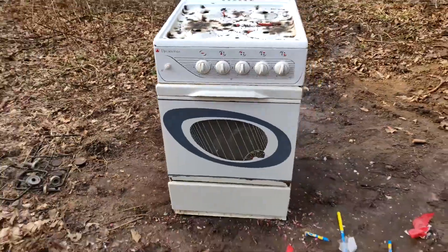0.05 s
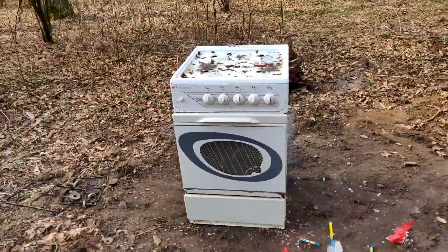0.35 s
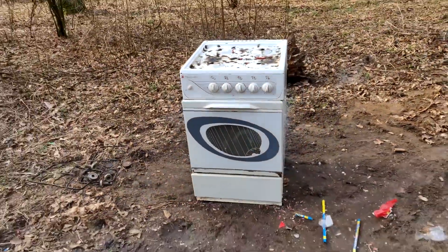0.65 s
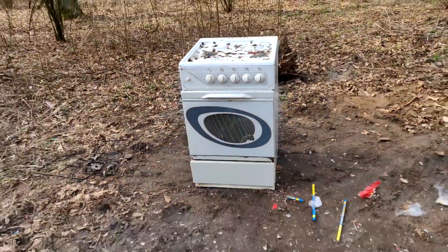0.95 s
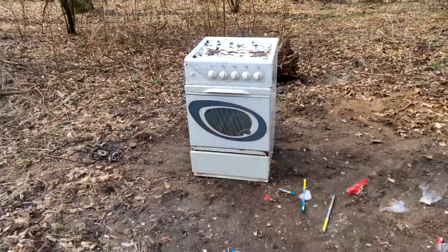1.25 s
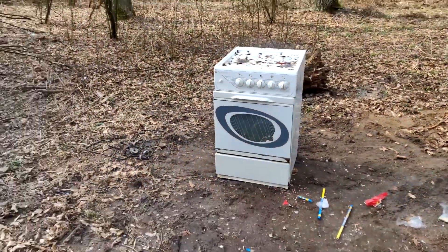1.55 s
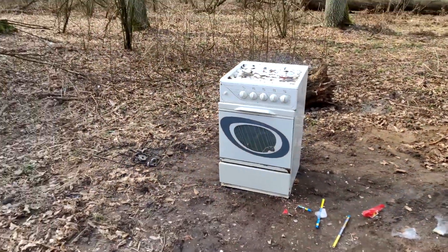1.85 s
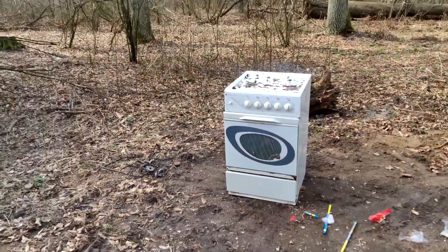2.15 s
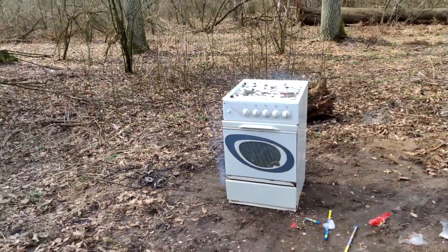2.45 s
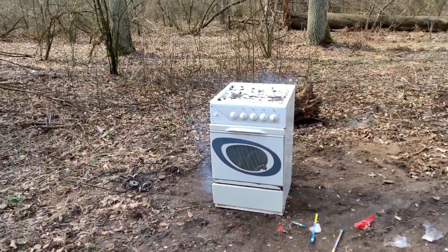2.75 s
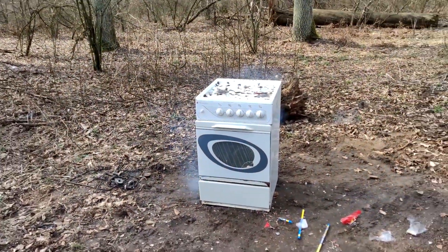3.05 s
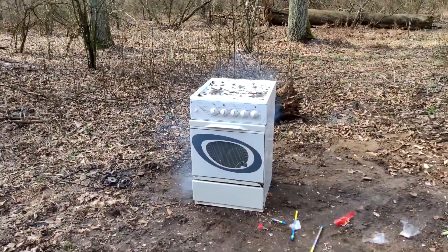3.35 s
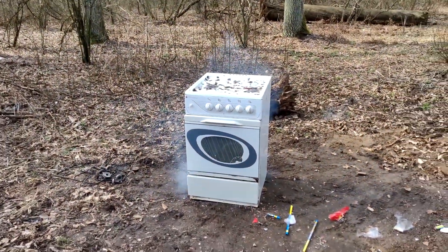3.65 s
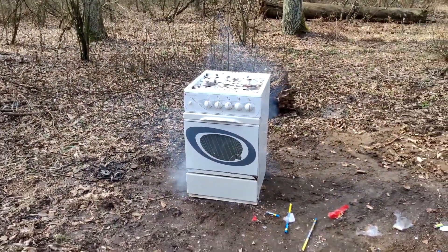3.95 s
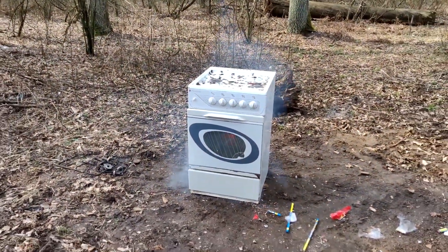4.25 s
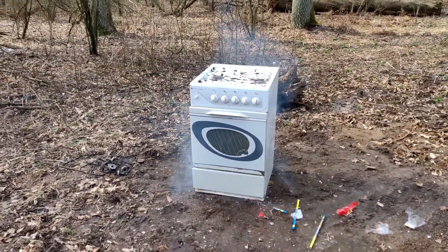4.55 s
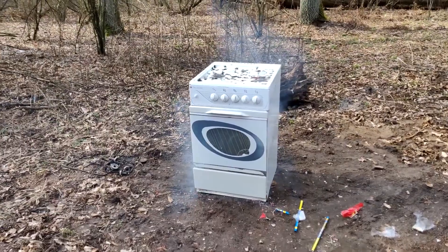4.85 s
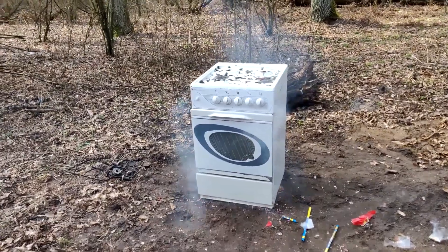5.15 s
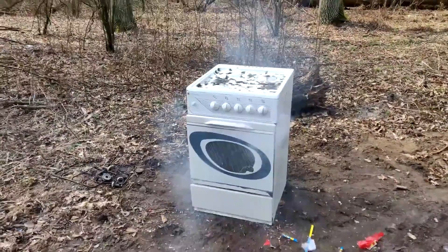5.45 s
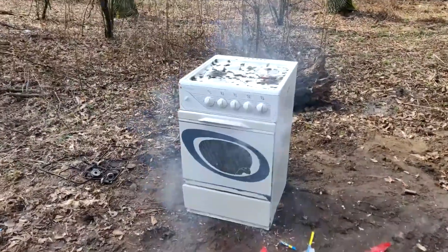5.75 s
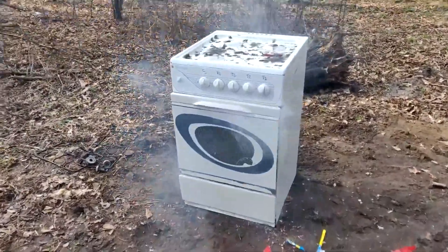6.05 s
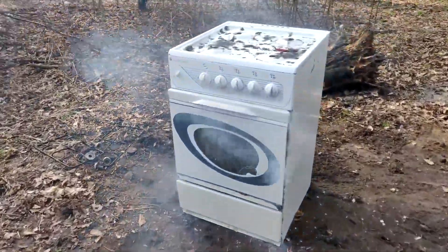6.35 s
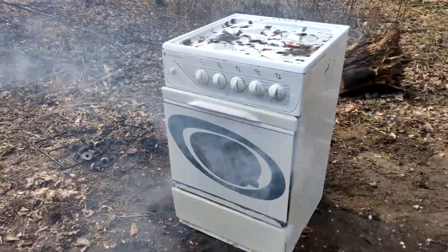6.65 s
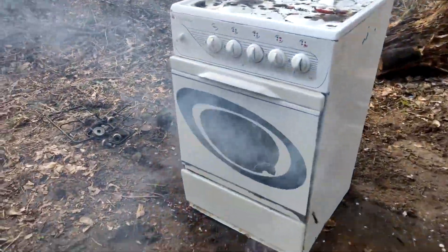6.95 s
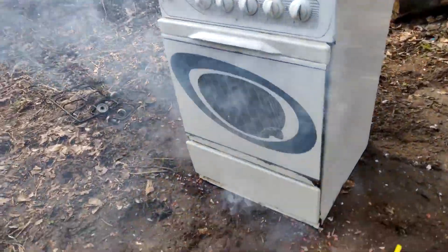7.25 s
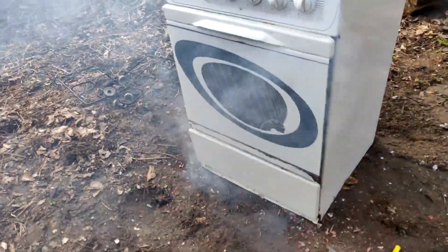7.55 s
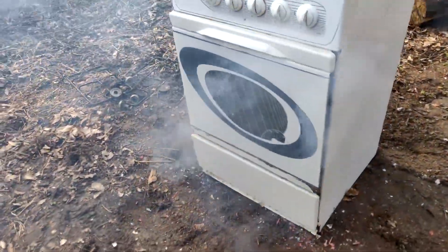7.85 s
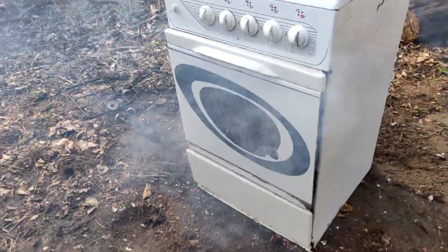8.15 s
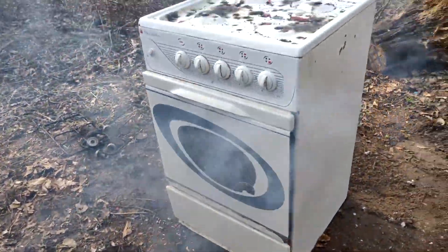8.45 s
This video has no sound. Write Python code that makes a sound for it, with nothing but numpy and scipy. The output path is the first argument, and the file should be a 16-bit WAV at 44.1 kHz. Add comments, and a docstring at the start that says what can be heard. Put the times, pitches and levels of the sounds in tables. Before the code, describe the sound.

Whistling firecrackers fire one after another in a metal oven outdoors, following a few quiet footsteps over faint wind. Brief piercing, hissing squeals start with pops and low puffs, alternating irregularly with sharp bangs that make the steel box ring. Each blast echoes among the trees and pushes air at the close, distorting microphone. Small scraps click lightly in between, and a last squeal runs into a final bang.

```python
"""Whistling firecrackers in an oven

A few soft steps, then firecrackers go off in a steel kitchen oven standing in a wood. Each lights
with a pop and shrieks as pulsing combustion sounds its tube, on a gliding pitch that hops up as the
fuel runs out. Bangs ring the sheet metal, echo among the trees and shove air at the close,
overloaded microphone."""
import sys
import numpy as np
from scipy import signal
from scipy.fft import rfft, irfft, next_fast_len
from scipy.io import wavfile

SR = 44100
rng = np.random.default_rng(int(sys.argv[2]) if len(sys.argv) > 2 else 0)


def int16_out(signal):
    """Quantize to a 16-bit WAV file."""
    q = np.round(np.clip(np.atleast_2d(signal).T, -1, 1) * 32767)
    wavfile.write(sys.argv[1], SR, q.astype(np.int16))


N = 383669
TIME = np.arange(N) / SR
LEFT_RIGHT = np.array([[1], [-1]])


def from_db(db):
    """Decibels to amplitude."""
    return 10 ** (np.asarray(db) / 20)


def rms_one(x):
    """Scale to rms 1."""
    return x / np.sqrt(np.mean(x ** 2) + 1e-20)


def at_hz(points, hz, column=1):
    """Interpolate a table on a log-frequency axis."""
    points = np.array(points)
    return np.interp(np.log(np.maximum(hz, 1)), np.log(points[:, 0]), points[:, column])


def add(out, start_s, sound):
    """Mix a sound in from start_s."""
    start = min(max(round(start_s * SR), 0), N)
    part = sound[..., :N - start]
    out[..., start:start + part.shape[-1]] += part


def decay(t60_s, size=SR):
    """Exponential fall, 60 dB in t60_s."""
    return np.exp(-np.log(1000) * TIME[:size] / max(t60_s, 1e-3))


def onset(rise_s, size=SR):
    """Exponential rise to 1."""
    return 1 - np.exp(-TIME[:size] / rise_s)


def drift(up_to_hz):
    """Smooth random motion, rms 1."""
    n = next_fast_len(N)
    hz = np.fft.rfftfreq(n, 1 / SR)
    lowpassed = rfft(rng.standard_normal(n)) / (1 + (hz / up_to_hz) ** 2)
    return rms_one(irfft(lowpassed)[:N])


# Left-right likeness: freq_hz, correlation
STEREO_CORRELATION = [(30, 0.97), (150, 0.86), (1000, 0.81), (3000, 0.5), (8000, 0.34), (16000, 0)]

def noise(spectrum, size=N):
    """Coloured stereo noise, channels more alike in the bass, rms 1."""
    n = next_fast_len(size, True)
    hz = np.fft.rfftfreq(n, 1 / SR)
    mid, side = rfft(rng.standard_normal((2, n))) * from_db(at_hz(spectrum, hz)) * (hz > 20)
    alike = np.clip(at_hz(STEREO_CORRELATION, hz), -1, 1)
    stereo = np.sqrt(1 + alike) * mid + np.sqrt(1 - alike) * side * LEFT_RIGHT
    return rms_one(irfft(stereo, n)[:, :size])


def tap(hz, t60_s, skirt_db):
    """Noise burst around one broad resonance."""
    peak = [(hz / 8, skirt_db), (hz / 2, skirt_db / 2), (hz, 0),
            (hz * 2, skirt_db / 2), (hz * 16, skirt_db * 2)]
    return noise(peak, size=SR) * decay(t60_s)


# Wind noise: freq_hz, density_db
WIND_SPECTRUM = [(15, -53), (25, -4), (53, 3.5), (141, -7.5), (439, -16.5), (641, -20.5), (1020, -22.5),
                 (1130, -28), (1290, -22), (1400, -31), (2220, -28), (3340, -34), (16000, -40)]

def wind(level_db=-47.5):
    """Faint, low rush of moving air."""
    return from_db(level_db + 0.29 * drift(14)) * noise(WIND_SPECTRUM)


# Scatter from the trees: freq_hz, level_db, t60_s
TREE_SCATTER = [(60, -8, 4.9), (153, -7, 2.4), (398, -3, 2.27), (900, -2.5, 2.67), (1850, -1, 2.23),
                (3100, 4, 1.45), (4272, 3, 1.33), (6050, 7, 1.01), (10000, 6, 0.58), (16000, -27, 0.33)]

def tree_echo(sound, build_s=0.031):
    """Echoes from countless trunks build up, then die away, treble first."""
    size, response = 2 * SR, 0
    edges_hz = np.geomspace(50, 17000, 15)
    for low, high in zip(edges_hz, edges_hz[1:]):
        hz = np.sqrt(low * high)
        bandpass = signal.butter(2, [low, high], "band", fs=SR, output="sos")
        band = signal.sosfilt(bandpass, rng.standard_normal((2, size)))
        level_db, t60_s = at_hz(TREE_SCATTER, hz), at_hz(TREE_SCATTER, hz, column=2)
        response += band * from_db(level_db) * decay(t60_s, size)
    response = rms_one(response * onset(build_s, size)) / np.sqrt(size)
    return signal.fftconvolve(sound, response, axes=1)[:, :N]


# Fuse noise: freq_hz, density_db
FIZZ_SPECTRUM = [(200, -40), (900, -13), (2500, 0.5), (5000, -11.5), (7500, -5.5), (11000, -21.5),
                 (14000, -11), (16000, -13)]
# Burning fuses: start_s, length_s, level_db
FUSES = [(2.8, .7, -62), (4.7, .75, -61), (6.2, .74, -47)]

def fuses(hiss_floor_db=-72, edge_s=0.08):
    """Lit fuses fizz unevenly over a faint, steady, high background hiss."""
    level = from_db(hiss_floor_db)
    for start_s, length_s, level_db in FUSES:
        inside_s = np.minimum(TIME - start_s, start_s + length_s - TIME)
        level = level + from_db(level_db) * np.clip(inside_s / edge_s, 0, 1)
    return level * from_db(1.5 * drift(2.2)) * noise(FIZZ_SPECTRUM)


# Footfalls: start_s, level_db, centre_hz, t60_s
STEPS = [(0.126, -34, 238, 0.06), (1.186, -37, 398, 0.034), (1.253, -29.5, 400, 0.04),
         (1.41, -48.5, 816, 0.17), (1.797, -33, 153, 0.15), (2.061, -36, 615, 0.075),
         (2.091, -36.5, 505, 0.085)]

def steps():
    """Feet land dully on soil and leaves."""
    out = np.zeros((2, N))
    for start_s, level_db, centre_hz, t60_s in STEPS:
        add(out, start_s, from_db(level_db) * tap(centre_hz, t60_s, skirt_db=-43) * onset(0.00093))
    return out


# Scrap impacts: start_s, level_db, centre_hz
SCRAP_CLICKS = [(.75, -58, 8000), (1.38, -53, 7500), (3.365, -34.5, 1720), (3.408, -37.5, 3260),
                (5.398, -34.5, 1750), (6.447, -42, 910), (6.852, -27.5, 1350)]

def scraps():
    """Falling scraps click lightly."""
    out = np.zeros((2, N))
    for start_s, level_db, centre_hz in SCRAP_CLICKS:
        add(out, start_s, from_db(level_db) * tap(centre_hz, t60_s=0.091, skirt_db=-15.5))
    return out


# Venting gas: start_s, level_db, centre_hz, t60_s
VENT_THUDS = [(2.406, -19, 140, 0.24), (3.494, -23, 140, .15), (4.309, -25.5, 141.7, .3),
              (4.89, -13, 134.5, 0.13), (6.06, -11.5, 200, 0.1), (6.095, -14.5, 149, 0.23),
              (6.945, -15, 231, 0.22), (8.227, -14, 217.6, 0.17), (8.24, -11.5, 125, 0.26)]

def vent_thuds():
    """Gas leaves the oven cavity in low, hollow puffs."""
    out = np.zeros((2, N))
    for start_s, level_db, centre_hz, t60_s in VENT_THUDS:
        add(out, start_s, from_db(level_db) * tap(centre_hz, t60_s, skirt_db=-23) * onset(0.0043))
    return out


# Cavity and panel modes: freq_hz, level_db, t60_s
OVEN_MODES = [(123, -27, .4), (151, -39, .9), (242, -38, .8), (440, -23, .25), (525, -20, .25),
              (619, -33, .8), (834, -31, .85), (996, -27, .2), (1184, -29, .85), (1232, -28, .3),
              (1943, -30, .25), (2220, -29, .2), (2450, -29, .2)]

def oven_ring(panel_hz, favour_db=9):
    """A blow rings the oven's modes, favouring those near the pitch of the panel hit hardest."""
    out = 0
    for hz, level_db, t60_s in OVEN_MODES:
        nearness = np.exp(-(np.log(hz / panel_hz) / 0.2) ** 2)
        phase = rng.uniform(0, 2 * np.pi) + rng.normal(0, 1.0, (2, 1))
        gain = from_db(level_db + favour_db * nearness + rng.normal(0, 0.45))
        out += gain * decay(t60_s) * np.sin(2 * np.pi * hz * TIME[:SR] + phase)
    return out


# Ignition puff: freq_hz, density_db
PUFF_SPECTRUM = [(30, -5), (70, 11.5), (160, 17), (300, -9), (520, 4), (750, 4.5), (1200, 8), (2300, 4.5),
                 (3500, 1), (6500, -13), (16000, -32)]
# Ignitions and casing knocks: start_s, level_db, t60_s, panel_hz
POPS = [(2.225, -21, 0.42, 516), (2.259, -8.5, 0.077, 480), (2.406, -16, 0.45, 132),
        (2.509, -19, 0.25, 130), (4.272, -26, 0.17, 599.6), (4.315, -15, 0.46, 129),
        (4.582, -13.5, 0.067, 716), (4.872, -17.5, 0.06, 622), (4.899, -14, 0.13, 830),
        (5.031, -14.5, 0.063, 304), (5.159, -21, 0.19, 311.3), (5.827, -9.5, 0.14, 480),
        (5.961, -16, 0.3, 700), (7.514, -13, 0.13, 131.9), (7.547, -12.5, 0.16, 134),
        (8.2239, -2.5, 0.16, 135), (8.529, -13.5, 0.097, 846)]

def pops(ring_db=1.5):
    """Ignition puffs and knocking casings sound the steel box."""
    out = np.zeros((2, N))
    for start_s, level_db, t60_s, panel_hz in POPS:
        puff = noise(PUFF_SPECTRUM, size=SR) * decay(t60_s)
        ring = from_db(ring_db) * oven_ring(panel_hz)
        add(out, start_s, from_db(level_db) * (puff + ring) * onset(0.0015))
    return out


# Air shoved at the microphone: start_s, left_gain, right_gain, first_swing_hz
PRESSURE_WAVES = [(3.51, 0.35, 0.096, 1.77), (3.663, -0.45, 2.03, 12.9), (5.474, 0.51, 1.54, 11.3),
                  (6.003, 0.072, 1, 17.06), (6.937, 0.44, 1.48, 10.4)]

def pressure_waves(slowing_s=0.0619, t60_s=1.62):
    """A pressure wave swings each diaphragm to and fro, ever more slowly."""
    out, t = np.zeros((2, N)), TIME[:2 * SR]
    for start_s, left_gain, right_gain, first_swing_hz in PRESSURE_WAVES:
        cycles = first_swing_hz * slowing_s * np.log1p(t / slowing_s)
        swing = np.sin(2 * np.pi * cycles) * decay(t60_s, t.size)
        add(out, start_s, np.array([[left_gain], [right_gain]]) * swing)
    return out


# Blast noise: freq_hz, density_db
BLAST_SPECTRUM = [(30, -33), (70, 4), (140, 8), (280, 1.5), (520, 6.5), (750, 1.5), (1200, 3.5), (2300, 1),
                  (3500, -5.5), (6500, -6.5), (10000, -22), (16000, -13)]
# Explosions: start_s, blast_db, t60_s, far_db, ring_db, panel_hz
BANGS = [(3.4889, -2, 0.17, -4.5, 3.5, 466), (3.662, -6.5, 0.21, -1, -51, 1402),
         (5.4633, -6, 0.22, -2.5, -3.5, 1160), (6.004, -3.5, 0.2, -5, -1, 585),
         (6.939, -1, 0.23, 3.8, 4.5, 1180), (8.696, -7.5, 0.18, 0, -1, 497.5)]

def bangs():
    """Blasts rattle around the oven; returns the near sound and what goes out to the trees."""
    near, far = np.zeros((2, N)), np.zeros((2, N))
    for start_s, blast_db, t60_s, far_db, ring_db, panel_hz in BANGS:
        blast = noise(BLAST_SPECTRUM, size=SR)
        ring = from_db(ring_db) * oven_ring(panel_hz)
        add(near, start_s, from_db(blast_db) * blast * decay(t60_s) + ring)
        add(far, start_s, from_db(far_db) * blast * decay(0.059))
    return near, far


def bounces(sound, spread_s, gain, count):
    """The sound darts about: its reflections shift and beat against the direct sound."""
    out = sound.copy()
    for k in range(count):
        delay_s = spread_s * (k + rng.uniform(0.524, 1)) / count + 0.0001 * drift(1.52)
        delayed = np.clip(np.arange(N) - np.round(delay_s * SR).astype(int), 0, N - 1)
        out[k % 2] += gain * sound[k % 2, delayed]
    return out / np.sqrt(1 + gain ** 2 * count / 2)


# Whistle burns: start_s, burn_s, fade_s, first_hz, last_hz, hop_hz, tone_db, hiss_db, roughness
BURNS = [(2.246, .4, .15, 3233, 2975, 220.7, -3, -22, .4),
         (4.286, 0.36, 0.053, 3285, 3055, 231.5, -4.5, -20.5, 0.82),
         (4.887, .313, 0.065, 3224, 2909, 205.2, -5, -25.5, 0.29),
         (5.827, 0.15, .043, 3235, 3180, 107.1, -3.5, -20.5, 0.54),
         (6.024, .116, .055, 3065, 3838, 419, -7, -32.5, .36),
         (7.538, 0.37, .038, 3378, 2925, 150, -4, -26.5, 0.19),
         (8.234, 0.37, 0.073, 3195, 2774, 291, -2, -21.5, 0.31)]

def burns():
    """Each charge flares, glides as its fuel burns down, then hops up in pitch and fades."""
    attack_s, release_s, flare_s, hop_s = 0.006, 0.02, 0.071, 0.025
    chirp_hz, chirp_s = 475.5, 0.01
    flare_hiss_db, fade_hiss_db, fade_tone_db = -0.5, -33, -18
    out = np.zeros((4, N))
    for start_s, burn_s, fade_s, first_hz, last_hz, hop_hz, tone_db, hiss_db, roughness in BURNS:
        t = TIME[:round((burn_s + fade_s + release_s / 2) * SR)]
        fuel = np.maximum(1 - t / burn_s, 0)
        spent_s = np.maximum(t - burn_s, 0)
        faded = spent_s / fade_s
        flare = np.exp(-t / flare_s)  # the priming burns fast and rough
        pitch_hz = last_hz + (first_hz - last_hz) * fuel ** 1.6
        pitch_hz += chirp_hz * np.exp(-t / chirp_s)  # starts sharp, settles
        pitch_hz += hop_hz * np.minimum(spent_s / hop_s, 1)
        attack = np.minimum(t / attack_s, 1)
        release = np.minimum((t[-1] - t) / release_s, 1)
        tone = attack * release * from_db(tone_db + fade_tone_db * faded ** 2)
        hiss = release * from_db(hiss_db + flare_hiss_db * flare + fade_hiss_db * faded)
        add(out, start_s, np.array([pitch_hz, tone, hiss, roughness + 0.286 * flare]))
    return out


# Sputters in the burn: centre_s, length_s, strength
SPUTTERS = [(2.405, 0.03518, 1), (2.439, 0.0498, 0.59), (2.509, 0.041, 1), (2.619, 0.02, 0.46),
            (4.352, 0.02986, .7), (4.549, 0.021, 0.17), (5.034, 0.032, 0.39), (5.182, 0.02586, 1),
            (5.212, 0.01976, 1), (5.992, 0.032, 0.37), (7.695, 0.019, 0.84), (8.419, 0.026, 0.92),
            (8.516, 0.023, 0.53), (8.623, 0.019, 0.53)]

def sputters(pitch_hz, tone, hiss, roughness):
    """A sputtering burn briefly turns sharper, quieter and rougher."""
    lift_hz, tone_db, hiss_db = 70.64, -5, -3
    sputter = sum(strength * np.exp(-(2 * (TIME - centre_s) / length_s) ** 2)
                  for centre_s, length_s, strength in SPUTTERS)
    return (pitch_hz + lift_hz * sputter, tone * from_db(tone_db * sputter),
            hiss * from_db(hiss_db * sputter), roughness + 0.445 * sputter)


# Gas jet: freq_hz, density_db
JET_SPECTRUM = [(40, -19.5), (130, -1.5), (250, 4.5), (520, 1.5), (800, -4), (1600, 2.5), (2400, 9.5),
                (4600, -0.5), (6500, 6), (9000, -12.5), (12000, -16.5), (16000, -9.5)]

def jet(hiss, gain_db=-1.5, panels_db=-28):
    """The jet's hiss, combed by the nearest walls, keeps the oven's panels singing."""
    direct = from_db(gain_db) * hiss * noise(JET_SPECTRUM)
    combed = bounces(direct, spread_s=0.0025, gain=0.4, count=6)
    panels = signal.fftconvolve(combed, oven_ring(panel_hz=714), axes=1)[:, :N]
    return combed + from_db(panels_db) * panels


# Pitch waver at roughness 1: up_to_hz, pitch_fraction
PITCH_WAVER = [(22, 0.00908), (79, 0.0229), (570, 0.02245)]
# Tube harmonics: multiple, level_db, lean_left_db
HARMONICS = [(1, -2.5, 0.36), (2, -17, 4.5), (3, -33, -3.5), (4, -34.5, -1.5), (5, -38.5, 0)]
# Noise bands between harmonics: multiple, level_db
RASP_BANDS = [(.5, -9), (1.5, 0), (2.5, -4.5), (3.5, -9), (4.5, -11)]

def whistles(tone_db=7, rasp_db=1.8, spit_db=3, spit_hz=27.7, flutter_hz=124):
    """Pulsing combustion sounds the tube; a rough burn staggers and smears its pitch."""
    pitch_hz, tone, hiss, roughness = sputters(*burns())
    hiss = hiss * from_db(spit_db * drift(spit_hz))
    waver = sum(fraction * drift(up_to_hz) for up_to_hz, fraction in PITCH_WAVER)
    phase = 2 * np.pi * np.cumsum(pitch_hz * (1 + roughness * waver)) / SR
    wave = 0
    for multiple, level_db, lean_left_db in HARMONICS:
        flutter = 1 + 0.52 * roughness * drift(flutter_hz)
        wave += from_db(level_db + lean_left_db * LEFT_RIGHT) * np.sin(multiple * phase) * flutter
    # strong and weak pulses alternate in short fits
    rasp = sum(from_db(db) * drift(190) * np.cos(multiple * phase) for multiple, db in RASP_BANDS)
    shriek = from_db(tone_db) * tone * wave + from_db(rasp_db) * hiss * rasp
    return bounces(shriek, spread_s=0.021, gain=0.62, count=10) + jet(hiss)


def scene(lean_left_db=0.59):
    """Firecrackers close by, their echo in the wood, steps and faint wind."""
    shrieks, knocks = whistles(), pops()
    near_bangs, far_bangs = bangs()
    echo = tree_echo(from_db(-8) * far_bangs + from_db(-32) * shrieks + from_db(-23) * knocks)
    around = wind() + knocks + vent_thuds() + near_bangs + echo + steps() + scraps() + fuses()
    return shrieks + around * from_db(lean_left_db * LEFT_RIGHT) + pressure_waves()


def record(dry):
    """The microphone overloads with a rounded knee; the top is cut."""
    cutoff_hz = 16100
    oversampled = signal.resample_poly(dry, 2, 1, axis=1)
    squashed = oversampled / (1 + oversampled ** 4) ** 0.25
    overloaded = signal.resample_poly(squashed, 1, 2, axis=1)[:, :N]
    lowpass = signal.ellip(10, 0.2, 70, cutoff_hz, fs=SR, output="sos")
    return np.clip(signal.sosfilt(lowpass, overloaded), -1, 1)


dry = scene()
out = record(dry)
int16_out(out)
```